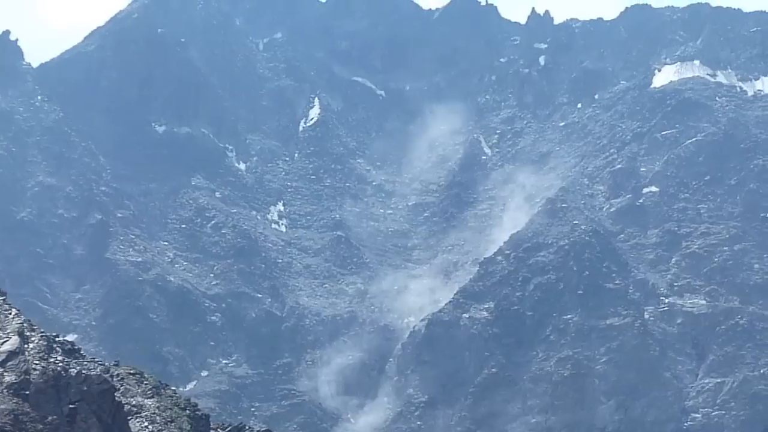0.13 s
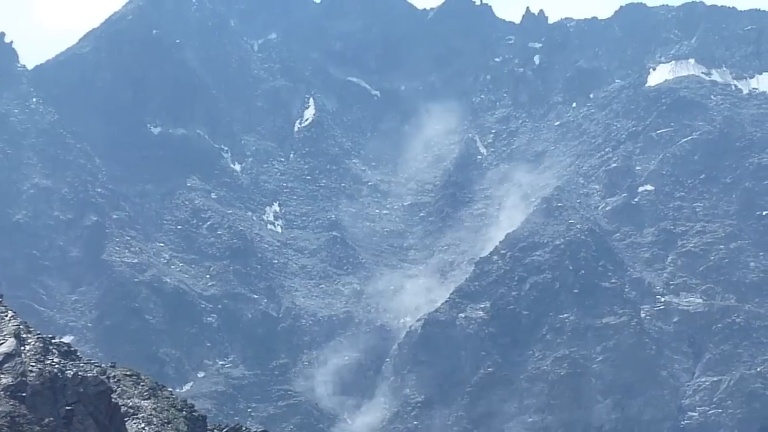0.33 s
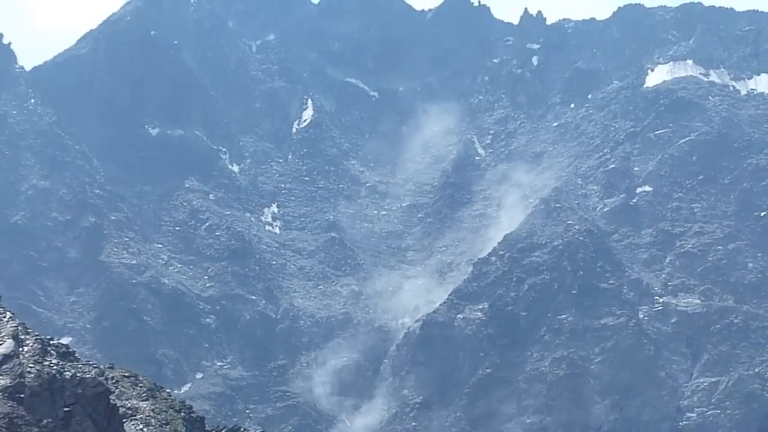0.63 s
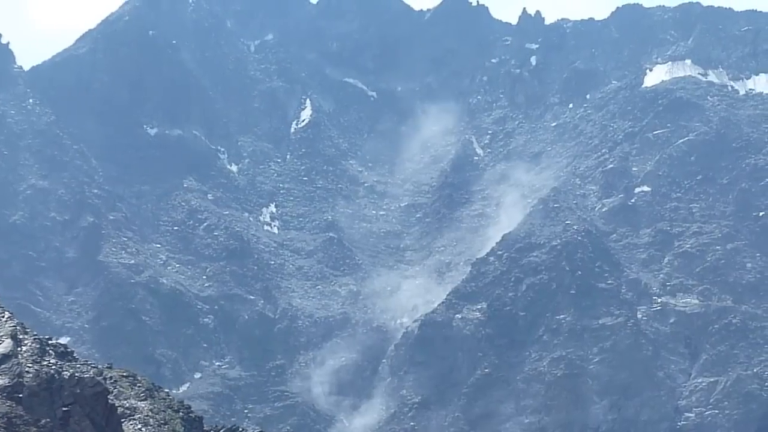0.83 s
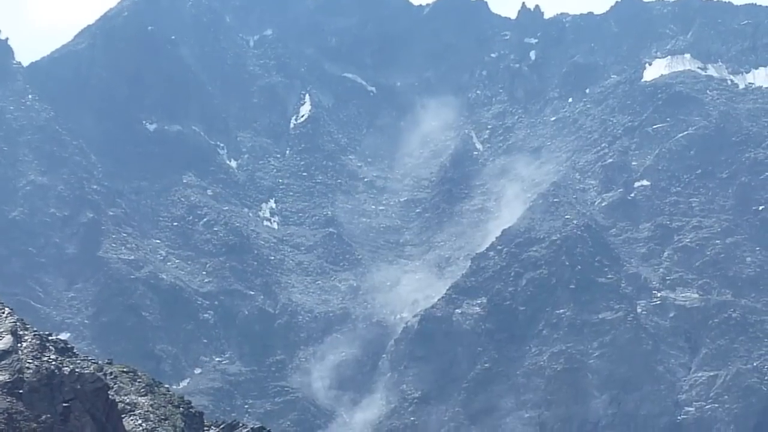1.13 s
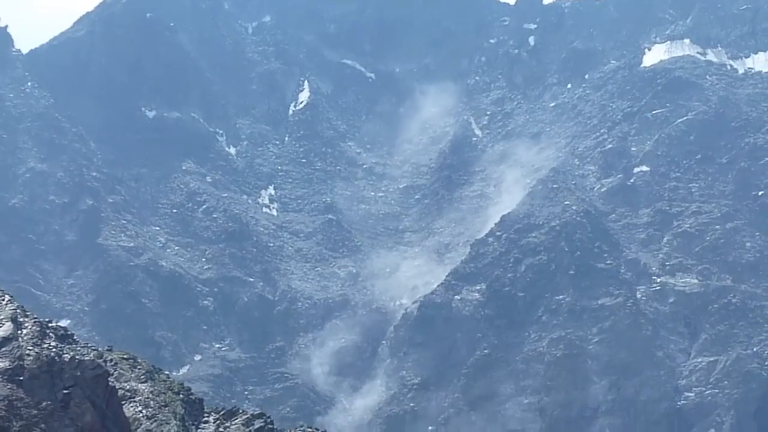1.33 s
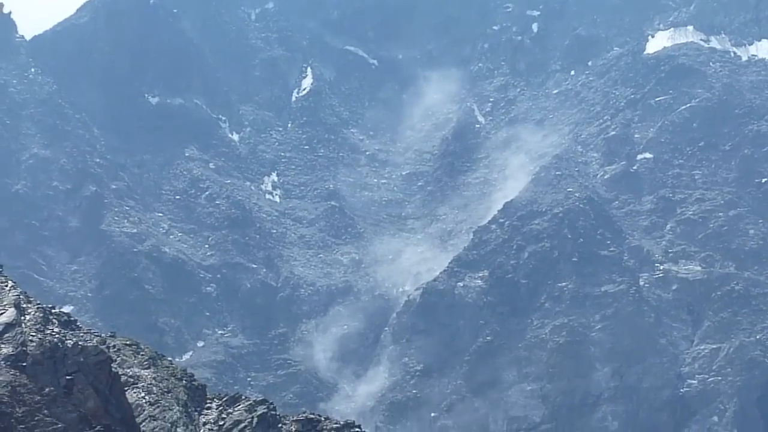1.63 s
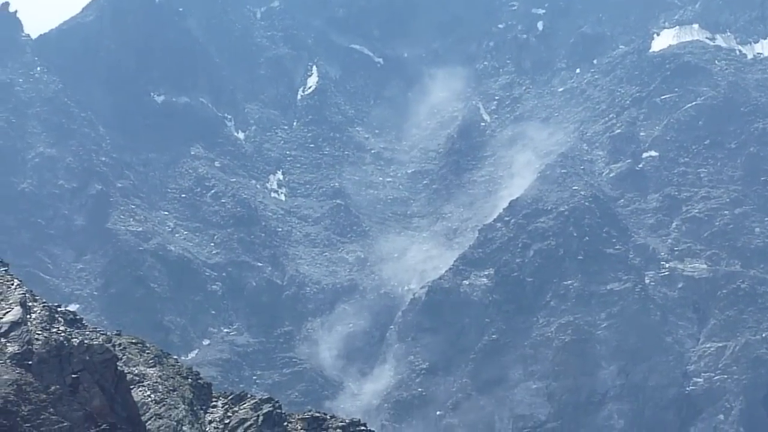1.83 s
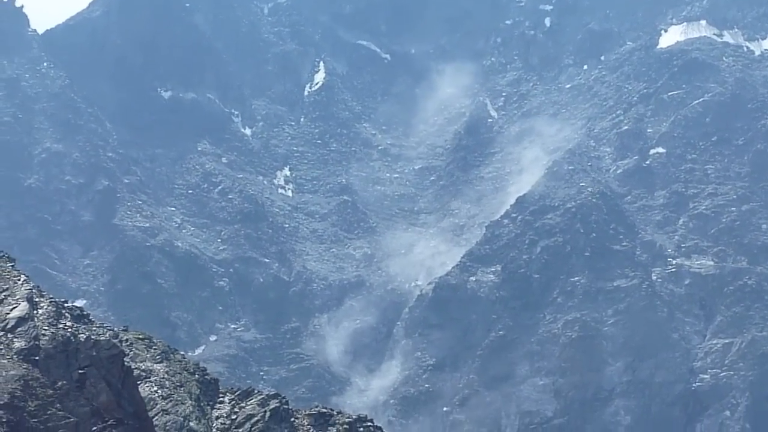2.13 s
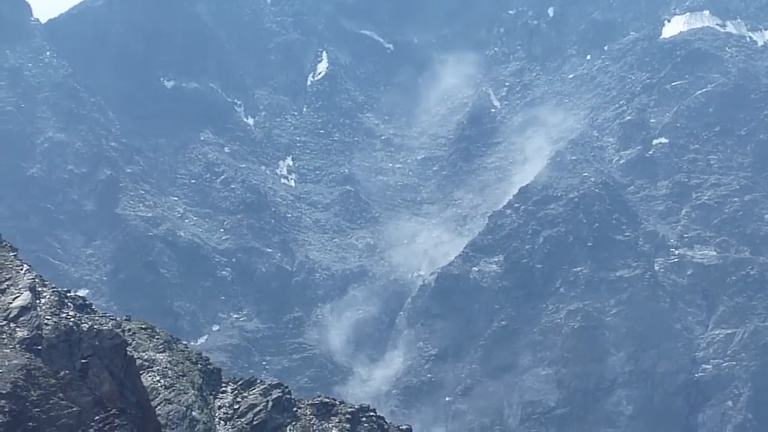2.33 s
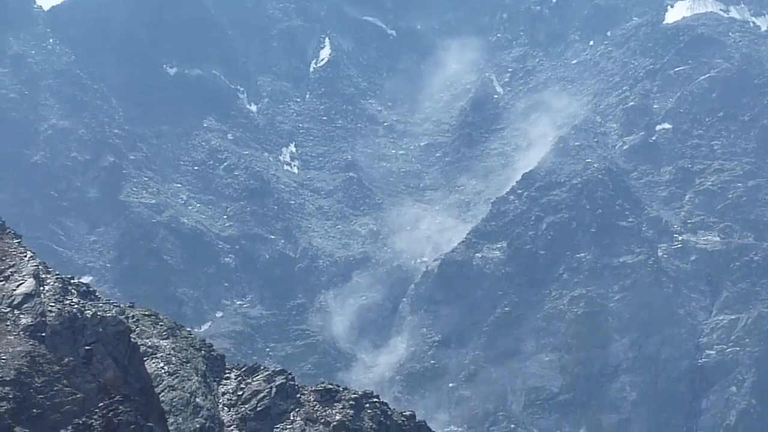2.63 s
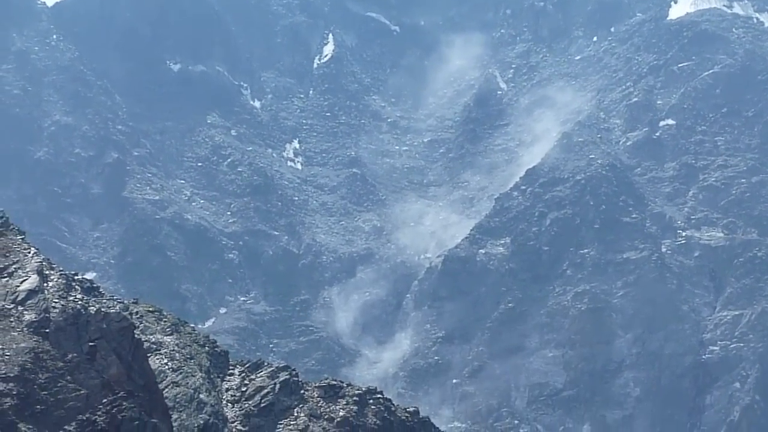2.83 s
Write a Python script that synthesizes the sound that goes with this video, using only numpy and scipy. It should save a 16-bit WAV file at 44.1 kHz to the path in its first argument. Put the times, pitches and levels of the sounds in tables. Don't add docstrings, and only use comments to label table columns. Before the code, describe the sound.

A distant rockfall rushes in a steady low roar across a wide mountain valley, starting with a cluster of knocks and thuds, thinning slightly, then one sharper block impact late; hissy small camera microphone.

```python
import sys
import numpy as np
from scipy import signal
from scipy.fft import rfft, irfft
from scipy.io import wavfile

SR = 44100
rng = np.random.default_rng(int(sys.argv[2]) if len(sys.argv) > 2 else 0)


def volts_from_decibels(level):
    exponent = np.asarray(level, float) / 20
    return 10 ** exponent


def materialize(psi):
    bounded = np.clip(np.atleast_2d(psi).T, -1, 1)
    quanta = np.round(bounded * 32767).astype(np.int16)
    wavfile.write(sys.argv[1], SR, quanta)


N = 132300


def rms_one(x):
    return x / np.sqrt(np.mean(x ** 2) + 1e-20)


def butter(x, cut_hz, kind="low"):
    return signal.sosfilt(signal.butter(2, cut_hz, kind, fs=SR, output="sos"), x)


def drift(rate):
    coarse = 40
    r = np.exp(-2 * np.pi * coarse * rate / SR)
    noise = rng.standard_normal(N // coarse + 2002)
    slow = signal.lfilter([1], [1, -2 * r, r * r], noise)[2000:]
    return np.interp(np.arange(N) / coarse, np.arange(len(slow)), rms_one(slow - slow.mean()))


def coloured(points):
    hz = np.fft.rfftfreq(N, 1 / SR)
    point_hz, point_db = np.transpose(points)
    level_db = np.interp(np.log(hz + 1), np.log(point_hz), point_db)
    return rfft(rng.standard_normal(N)) * volts_from_decibels(level_db), hz


def roar():
    # t/s, level/dB
    fall_vigour = [(0.03, -37), (0.14, -37.5), (0.79, -38), (1.32, -38.5), (2.26, -39), (2.97, -39.5)]
    # f/Hz, level/dB per Hz
    roar_colour = [(30, -25.5), (100, -23.5), (255, -17), (515, -14), (1480, -19), (2200, -27.5),
                   (2700, -32), (3600, -60)]
    gain_db, patchy_db, shared = 1.0, 0.33, 0.38
    spectrum, hz = coloured(roar_colour)
    place = np.clip(2 * np.log2(hz / 25 + 1e-9), 0, 16)
    together = drift(11.0)
    out = np.zeros(N)
    for k in range(17):
        crossfade = np.cos(np.pi / 2 * np.clip(place - k, -1, 1)) ** 2
        band = irfft(spectrum * crossfade, N)
        depth_db = patchy_db * np.clip(1.6 - 0.041 * k, 0.1, 2)
        out += band * volts_from_decibels(depth_db * (shared * together + drift(5.2)))
    s, db = np.transpose(fall_vigour)
    return rms_one(out) * volts_from_decibels(gain_db + np.interp(np.arange(N) / SR, s, db))


def thud(clicks, hz, octaves):
    half = 2 ** (octaves / 2)
    return butter(clicks, [hz / half, hz * half], "band")


def blocks():
    # t/s, peak level/dB, thud f/Hz, echo t60/s
    block_landings = [(.114, -32, 690, .04), (.127, -26, 600, 0.068), (.306, -36, 600, 0.039),
                      (.566, -28.5, 224, 0.23), (1.373, -30, 657, 0.046), (1.824, -32, 560, 0.065),
                      (2.2164, -19, 440, .015), (2.2192, -22, 220, .06), (2.2258, -24, 400, .015),
                      (2.2318, -24.5, 400, .015), (2.237, -28.5, 374, .3), (2.338, -35, 380, 0.12),
                      (2.228, -26, 1000, .1), (2.302, -28, 800, 0.043), (2.495, -33, 247, 0.044),
                      (2.92, -34, 226, 0.063)]
    echoes_per_s, echo_db = 560, -5.5
    size = SR // 4
    t = np.arange(size) / SR
    out = np.zeros(N + SR)
    for s, db, hz, t60 in block_landings:
        scattered = (rng.random(size) < echoes_per_s / SR) * (t > 1 / hz)
        signs = rng.choice([-1, 1], size)
        echoes = scattered * signs * volts_from_decibels(echo_db - 60 * t / t60)
        landing = thud((t == 0) + echoes, hz, octaves=1.0)
        start = int(s * SR)
        out[start:start + size] -= landing / np.abs(landing).max() * volts_from_decibels(db)
    return out[:N]


def surges():
    # start t/s, top t/s, end t/s, rms level/dB, centre f/Hz
    heap_surges = [
        (0.037, 0.086, 0.17, -40.5, 171),
        (0.042, .135, 0.21, -33.5, 563),
        (.85, 0.9, 0.964, -41, 460),
        (1.034, 1.152, 1.32, -40.5, 604),
        (1.5, 1.561, 1.63, -41, 450),
    ]
    hits_per_s = 760
    t = np.arange(N) / SR
    out = np.zeros(N)
    for start, top, end, db, hz in heap_surges:
        hits = (rng.random(N) < hits_per_s / SR) * rng.standard_normal(N)
        swell = np.interp(t, [start, top, end], [0, 1, 0]) ** 0.5
        out += rms_one(thud(hits, hz, octaves=1.63)) * volts_from_decibels(db) * swell
    return out


def slabs():
    # t/s, level/dB, f/Hz
    slab_knocks = [(0.038, -32, 693), (0.067, -29, 458), (0.069, -31, 325), (0.082, -38, 1023),
                   (0.087, -37, 716), (0.088, -30.5, 160), (0.1, -29, 436), (0.116, -27, 568),
                   (0.117, -31.5, 816), (0.121, -37, 144), (0.124, -41, 986), (0.125, -36.5, 326),
                   (0.131, -35, 807), (0.137, -36.5, 710), (0.146, -30, 544), (0.148, -30, 216),
                   (0.164, -37.8, 160), (0.164, -39, 547), (0.166, -35.5, 385), (0.185, -32.5, 304),
                   (0.197, -33.5, 917), (0.265, -36.7, 288), (0.301, -33, 874), (0.31, -30.5, 434),
                   (0.316, -36.5, 1022), (0.48, -36.5, 828), (0.498, -33, 368), (0.556, -35, 699),
                   (0.571, -43, 483), (0.571, -26.5, 217), (0.604, -32, 283), (0.669, -33, 697),
                   (0.712, -37.5, 330), (0.752, -34.5, 530), (0.825, -37.6, 747), (0.866, -39, 860),
                   (0.876, -39, 410), (0.881, -42, 1017), (0.885, -36.5, 301), (0.891, -30.5, 492),
                   (0.938, -33.5, 512), (0.986, -39.5, 745), (1.07, -38, 371), (1.116, -36, 796),
                   (1.131, -37, 636), (1.187, -32.5, 633), (1.375, -33.5, 803), (1.377, -35.5, 548),
                   (1.529, -37.5, 183), (1.569, -38, 956), (1.577, -36.8, 417), (1.644, -32, 320),
                   (1.645, -32.5, 528), (1.684, -37.1, 308), (1.829, -38.5, 552), (2.056, -34.5, 962),
                   (2.249, -38, 326), (2.307, -36, 990), (2.345, -38, 460), (2.351, -34.5, 327)]
    rise_s, wobble = 0.005717, 0.024
    t = np.arange(SR // 20) / SR
    shape = t / rise_s * np.exp(1 - t / rise_s)
    out = np.zeros(N + SR)
    for s, db, hz in slab_knocks:
        phase, glide = rng.random(2)
        bend = wobble * (2 * glide - 1) * (t - rise_s) ** 2 / rise_s / 4
        turns = hz * (t + bend) + phase
        start = int((s - 1.5 * rise_s) * SR)
        out[start:start + len(t)] += volts_from_decibels(db) * shape * np.sin(2 * np.pi * turns)
    return out[:N]


def stones():
    stones_per_s, spread_db, level_db, cycles = 300, 5.5, -47.5, 1.8
    pitches = np.geomspace(151, 800, 12)
    sizes = volts_from_decibels(spread_db * np.minimum(rng.exponential(1, N), 4.0)) * rng.choice([-1, 1], N)
    born = rng.random(N) < stones_per_s / SR
    dealt = rng.integers(0, len(pitches), N)
    out = np.zeros(N)
    for k, hz in enumerate(pitches):
        r = volts_from_decibels(-60 * hz / (cycles * 2 * SR))
        w = 2 * np.pi * hz / SR
        hits = sizes * born * (dealt == k) + 1e-18
        out += signal.lfilter([np.sin(w), -np.sin(w)], [1, -2 * r * np.cos(w), r * r], hits) / w
    return volts_from_decibels(level_db) * rms_one(butter(out, 1400))


def scene():
    heavy = butter(blocks() + surges(), 125, "high")
    return (roar() + stones() + slabs() + butter(heavy, 900))[None]


def hiss(clock_hz):
    # f/Hz, level/dB per Hz
    hiss_colour = [(20, -17.5), (1000, 17.5), (3500, 5), (5000, 2), (6300, 2), (8000, -4)]
    spectrum, hz = coloured(hiss_colour)
    return volts_from_decibels(-50) * rms_one(irfft(spectrum * (hz < clock_hz / 2), N))


def notched(x, clock_hz):
    notch_centres = [2996, 4398, 8000]
    notch_widths = [950, 1050, 600]
    for notch, width in zip(notch_centres, notch_widths):
        c = np.cos(2 * np.pi * notch / clock_hz)
        r = np.exp(-np.pi * width / clock_hz)
        if notch == clock_hz / 2:
            b, a = [1, 1.0], [1, r]
        else:
            b, a = [1, -2 * c, 0.97], [1, -2 * r * c, r * r]
        x = signal.lfilter(b, a, x) * sum(a) / sum(b)
    return x


def whine(count, clock_hz):
    whine_lines = {-2: -104, -1: -97, 0: -80, 1: -82, 2: -81.5, 4: -90, 5: -96, 7: -96}
    first_hz, step_hz = 7916.8, 30.07
    t = np.arange(count) / clock_hz
    out = np.zeros(count)
    for step, db in whine_lines.items():
        turns = (first_hz - step * step_hz) * t + rng.random()
        out += np.sqrt(2) * volts_from_decibels(db) * np.sin(2 * np.pi * turns)
    return out


def band_limit(x):
    return signal.sosfilt(signal.butter(12, 10250, fs=SR, output="sos"), x)


def record(dry):
    clock_hz, offset = 16000, -0.0458
    x = butter(dry[0], 92, "high") + hiss(clock_hz)
    count = N * clock_hz // SR
    x = irfft(rfft(x)[:count // 2 + 1], count) * count / N
    x = notched(x, clock_hz) + whine(count, clock_hz)
    up, down = 441, 160
    taps = signal.firwin(16 * up + 1, 8000, window=("kaiser", 9.0), fs=clock_hz * up)
    y = signal.resample_poly(x, up, down, window=taps)
    return band_limit(y[None, :N] + offset)


dry = scene()
out = record(dry)
materialize(out)
```